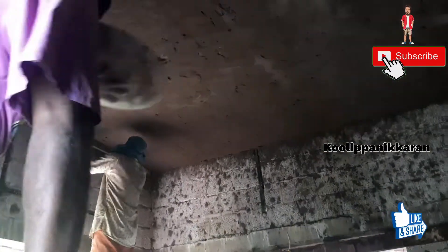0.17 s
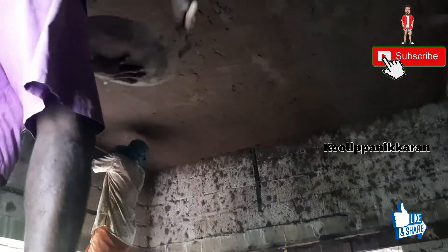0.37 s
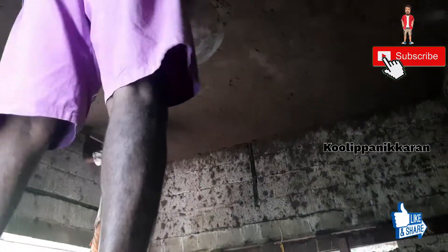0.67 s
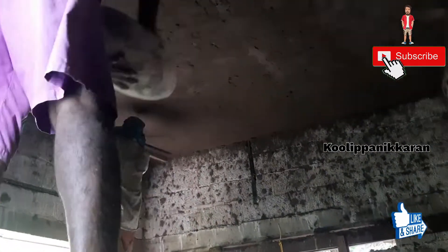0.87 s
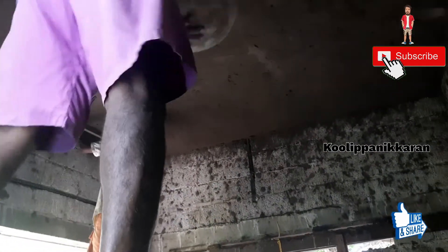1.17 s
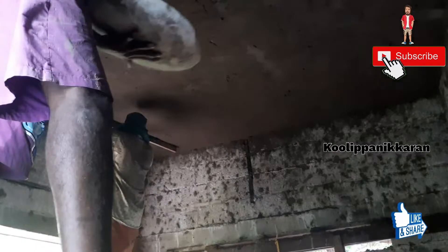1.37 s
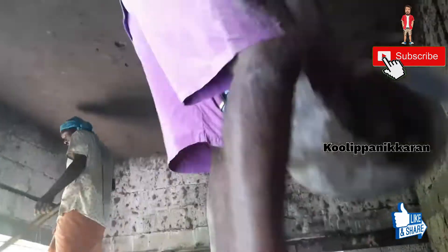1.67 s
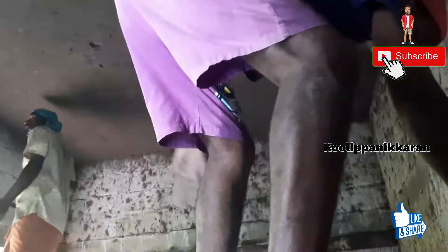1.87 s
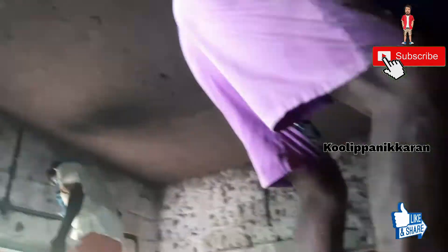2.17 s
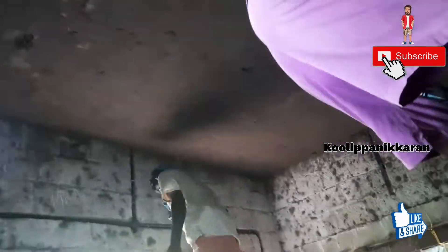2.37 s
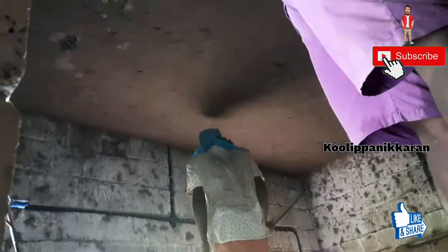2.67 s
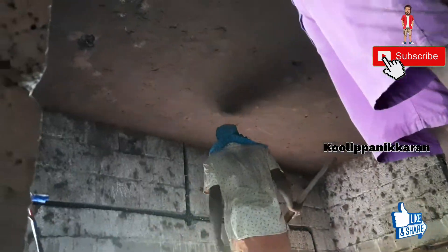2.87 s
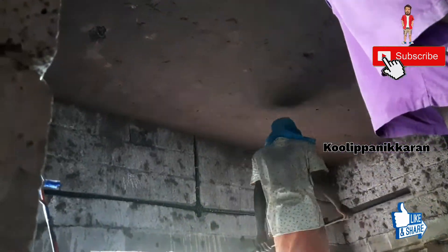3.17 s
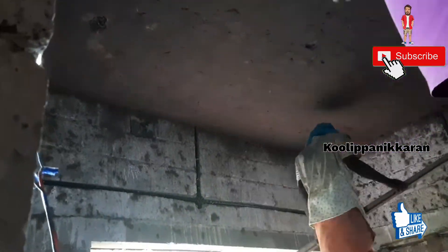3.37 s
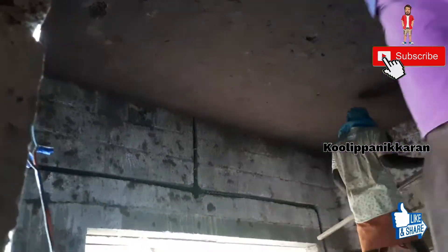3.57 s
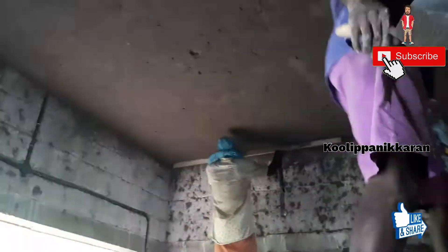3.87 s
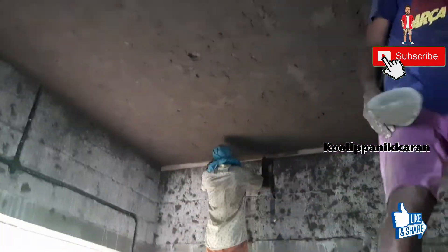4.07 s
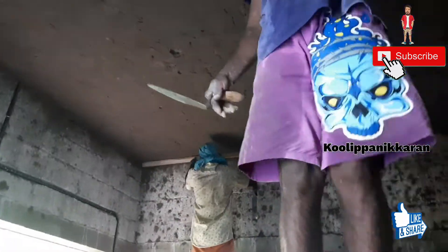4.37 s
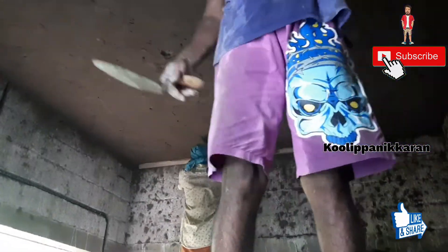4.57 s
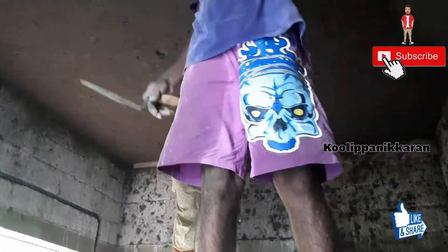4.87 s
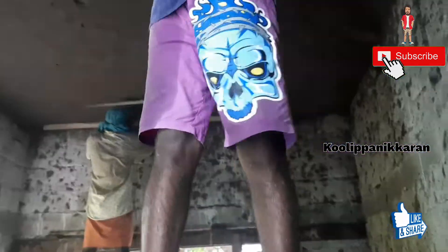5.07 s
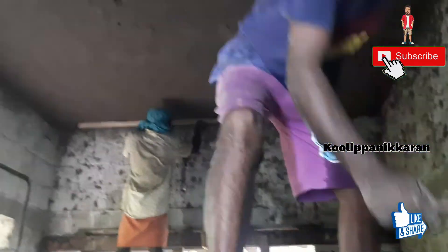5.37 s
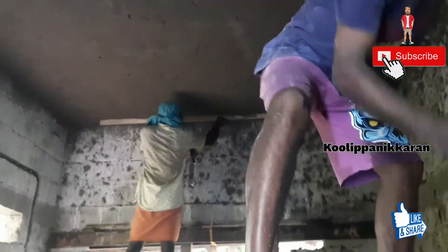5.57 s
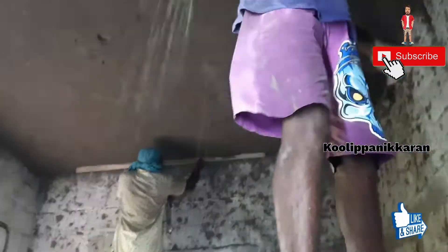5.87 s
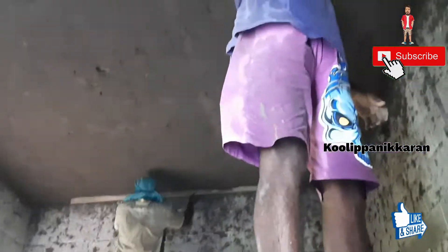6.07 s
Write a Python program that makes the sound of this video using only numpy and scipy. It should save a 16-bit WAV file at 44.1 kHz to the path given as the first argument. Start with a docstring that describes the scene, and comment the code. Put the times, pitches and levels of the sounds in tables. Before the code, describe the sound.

Plasterers work close by in a bare concrete room. Firm gritty scrapes and bright, quickly damped steel taps open, then heavy hollow thuds of planks hit around 1.7 and 3.3 seconds. Short light scratches and ticks fill the middle, softer longer strokes follow, a sharp tap rings at 5.5, and a plank groans near the end. Close microphone, short hard echo.

```python
"""Plasterers with steel trowels and sandy mortar in a bare concrete room, 6.23 s, two channels.
Firm short strokes and taps open over a drag: shaped noise for grit and blade tone, damped modes for taps.
Heavy thuds at 1.7-1.9 s and 3.3 s, random contacts rattling plank modes; some dead blows, single pulses.
Short strokes fill the middle; longer, softer ones follow. A sharp tap at 5.5 s, then a wavering plank groan.
Plank grumble and sway, shaped noise, run throughout; the hits echo in decaying noise."""
import sys
import numpy as np
from scipy import signal
from scipy.fft import rfft, irfft, next_fast_len
from scipy.io import wavfile
from scipy.ndimage import uniform_filter1d, map_coordinates

SR = 44100
rng = np.random.default_rng(int(sys.argv[2]) if len(sys.argv) > 2 else 0)


def waveform_to_disk(signal):
    """Save audio, clipped to [-1, 1], as 16-bit WAV at the path in sys.argv[1]."""
    frames = np.transpose(np.atleast_2d(signal))
    scaled = np.clip(frames, -1, 1) * 32767
    samples = np.round(scaled).astype(np.int16)
    wavfile.write(sys.argv[1], SR, samples)


N = 274743  # samples

# Room decay: freq_hz, t60_s
ROOM_DECAY = [(100, 0.4), (1000, 0.22), (10000, 0.39)]
# Planks under shifting weight: time_s, grumble_db, sway_db
WEIGHT_SHIFTS = [(0, -47, -63), (.35, -37.5, -73), (.69, -52, -78), (1.04, -43, -62), (1.28, -53, -64),
                 (1.52, -37, -42), (1.72, -32.5, -43), (1.87, -46, -47), (1.99, -37.5, -52),
                 (2.2, -51.5, -64), (2.45, -51, -53), (2.65, -55, -60), (2.95, -45.5, -64),
                 (3.25, -57.5, -62), (3.42, -45, -49), (3.54, -52.5, -51), (3.9, -53.5, -56),
                 (4.2, -51.5, -60), (4.46, -47, -54), (4.7, -56, -63), (5.08, -47, -50), (5.6, -39.5, -54),
                 (5.92, -32.5, -40), (6.23, -45, -51)]
# Plank modes: freq_hz, width_hz, level_db
PLANK_MODES = [(49, 28, -11.5), (119.5, 72, -6), (183.5, 79, -2.5), (261, 90, -1.5), (369, 120, -2),
               (509, 130, -3.5), (671, 185, -5), (1020, 820, -14)]
# Frame sway spectrum: freq_hz, relative_level_db (per Hz)
SWAY_SPECTRUM = [(12, -43), (30, -7), (60, -8), (120, -6.5), (200, -42)]
# Groan of a bending plank: time_s, pitch_hz, level_db
GROAN_PATH = [(5.84, 360.4, -54), (5.87, 337, -42), (5.92, 250.6, -25.5), (5.955, 280, -34),
              (6, 159.6, -39), (6.07, 171, -33), (6.11, 149.6, -42), (6.18, 172, -36), (6.23, 149, -42)]
# Rattling thuds on the planks: start_s, peak_db, pitch_hz, clatter_over_knock_db
THUD_HITS = [(.015, -19.5, 770, -6), (.162, -18, 556, -3.5), (.385, -19, 430, -31), (.702, -31.5, 415, -15),
             (1.029, -25, 614, -12), (1.123, -32, 102, -19), (1.488, -26.5, 137, -17),
             (1.592, -16, 484, -20), (1.629, -24, 188, -15), (1.708, -8.5, 428, -14),
             (1.795, -8.5, 670, -12), (1.919, -13.5, 292, -9), (2.085, -29, 310, -25),
             (2.275, -24, 305, -11), (2.512, -33, 175, -13), (2.774, -29.5, 268, 0), (2.812, -27.5, 437, 2),
             (3.016, -32.5, 388, -19), (3.094, -22.5, 406, -28), (3.234, -36.5, 339, -14),
             (3.304, -9.5, 262, 2), (3.312, -17, 900, -3), (3.346, -18.5, 368, -21), (3.662, -37, 347, -13),
             (3.758, -33.5, 296, -7), (3.951, -29.5, 471, -1.5), (3.972, -20.5, 315, -39),
             (3.98, -23.5, 90, -37), (4.486, -28.5, 503, -9), (4.934, -30.5, 590, -1), (4.97, -29, 400, -6),
             (5.059, -29.5, 267, -19), (5.203, -23.5, 210, -4), (5.237, -25, 487, 0),
             (5.267, -27, 993, 1.5), (5.879, -20, 308, -16), (5.97, -19.5, 480, -11),
             (6.038, -24.5, 161, -15), (6.079, -19.5, 272, -14)]
# Single dead blows: start_s, push_db, pitch_hz, snap_over_push_db
DEAD_BLOWS = [(1.904, -14, 250, -17), (3.298, -7, 354, -10), (3.373, -13, 377, -25), (3.976, -20, 305, -20),
              (5.719, -21, 385, -23)]
# Blade taps: start_s, peak_db, struck_pitch_hz
BLADE_TAPS = [(.0204, -17, 1570), (.0675, -12, 1230), (0.1626, -14.5, 1250), (0.916, -10.5, 1780),
              (.9787, -14, 1240), (1.5998, -18, 1130), (1.628, -21, 2200), (2.308, -12, 1680),
              (2.577, -29.5, 1930), (2.6015, -25, 2730), (2.7157, -28, 3660), (2.7284, -26, 2150),
              (2.816, -29, 1340), (2.8826, -24, 3200), (2.8945, -20, 2270), (2.9367, -28, 2090),
              (3.0142, -35, 2130), (3.0812, -21, 2100), (3.3998, -36, 1720), (3.4123, -25.5, 2110),
              (3.845, -31, 1410), (3.903, -34.5, 1500), (4.1393, -26, 1910), (5.239, -18.5, 1140),
              (5.2685, -24, 1500), (5.5211, -7, 1830), (5.7433, -24.5, 1800), (5.8703, -22, 1230)]
# Damped blade modes: freq_hz, mean_level_db, t60_s
BLADE_MODES = [(1237, -11.5, 0.027), (1430, -18, 0.067), (1798, -2, 0.042), (2030, 5, 0.018),
               (2750, 1, 0.018), (3410, 15, 0.0089), (3600, -23, 0.059), (6030, -29, 0.013)]
# Spreading between strokes: time_s, hiss_db
DRAG_LEVEL = [(0, -35.5), (.17, -44.5), (.25, -50.5), (.41, -43.5), (.69, -51.5), (.92, -37), (1.17, -49.5),
              (1.61, -41), (1.88, -59), (2.19, -59), (2.65, -59.5), (2.78, -51.5), (3.2, -59.5), (3.9, -57),
              (4.04, -45.5), (4.19, -58), (4.75, -64), (4.91, -54.5), (5.52, -40.5), (5.63, -51),
              (5.99, -56), (6.23, -48)]
# Trowel strokes: start_s, length_s, start_hiss_db, swell_to_end_db, tone_over_hiss_db
TROWEL_STROKES = [(.017, 0.034, -28, -2.5, 1.5), (.063, 0.018, -25, -4.5, -1),
                  (.165, 0.012, -32.5, -7, 10.5), (.462, .044, -31, 8.5, 1), (0.568, .07, -51, 0.5, 7),
                  (0.913, .038, -29.5, 4.5, 2.5), (.971, 0.016, -37, 6, 6.5), (1.298, 0.085, -48, 1.5, -1),
                  (1.418, 0.13, -35, -10, -0.5), (1.596, .0094, -36, 7.5, 1),
                  (1.713, 0.049, -29.5, -10.5, 1), (1.796, 0.016, -36.5, -7.5, 12),
                  (1.905, 0.015, -44.5, 9, 8.5), (1.943, .11, -47.5, -7.5, 6.5), (2.122, .012, -47, 1, -7),
                  (2.23, 0.021, -39, -2.5, 3.5), (2.255, 0.042, -33.5, 7.5, .6),
                  (2.304, 0.009, -24.5, -2.5, 3.5), (2.369, 0.088, -52.5, 5, 4), (2.491, .03, -53, -2, 5),
                  (2.589, .016, -46, 10.5, -6.5), (2.732, 0.013, -35.5, -4, 1.2),
                  (2.774, 0.029, -41, -8.5, 3), (2.818, .013, -31.5, -14, -2.5), (2.885, .016, -40, 6.5, 2),
                  (2.923, .013, -44, 8, 0), (2.983, 0.02, -48.5, -5, 5), (3.018, 0.016, -38.5, -5, 4),
                  (3.082, 0.014, -44.5, 3.5, 4.5), (3.132, .03, -54.5, 9.5, -6), (3.239, .014, -52, -12, 6),
                  (3.35, 0.016, -43.5, -7, 3), (3.401, .073, -50, 2.2, 3), (3.59, 0.047, -57.5, 0, 4.5),
                  (3.666, .038, -56.5, 2.2, 7.5), (3.782, 0.02, -45, -5, -0.5), (4.052, 0.09, -45, 6, -2),
                  (4.226, 0.065, -40, 2.5, -5.5), (4.338, .046, -45, 3.5, -3.5),
                  (4.414, .018, -43.5, .6, -1.5), (4.48, .024, -53, 9, 3.5), (4.561, 0.038, -41.5, -1, -2),
                  (4.645, 0.047, -43.5, 4, -3.5), (4.878, .12, -45, 7, 0), (5.099, 0.018, -45.5, 1.5, -13),
                  (5.163, 0.079, -40, 2.5, -2.5), (5.265, .017, -43.5, -12, 15.5),
                  (5.519, .013, -36.5, 1.5, 4.5), (5.673, .06, -40, 1, -8), (5.798, 0.18, -40, -1.5, -2.5),
                  (6.035, 0.063, -44, -0.5, -1), (6.124, .13, -42.5, 2.5, -6.5)]
# Blade angle: time_s, tilt (0 flat, 1 on edge)
BLADE_TILT = [(0, .5), (1, 0.45), (1.9, 0.25), (2.7, 0.66), (3.1, .65), (4, 0.12), (5.3, 0.06), (5.7, 0.5),
              (6.23, .45)]
# Sand hiss spectrum: freq_hz, relative_level_db (per Hz)
SAND_SPECTRUM = [(1200, -25.5), (2400, -11), (3200, -12), (5400, -9.5), (6700, -8.5), (7800, -11.5),
                 (9200, -22.5), (11500, -15.5), (15800, -13.5)]
# Flat blade spectrum: freq_hz, relative_level_db (per Hz)
FLAT_SPECTRUM = [(350, -17), (700, -7), (1000, -4.5), (1500, -3.5), (1900, -11), (2500, -27), (4000, -61)]
# Blade on edge spectrum: freq_hz, relative_level_db (per Hz)
EDGE_SPECTRUM = [(900, -34), (1500, -2.5), (1900, 1), (2300, -3.5), (3100, -6), (3900, -10), (5500, -27)]
# Position of the work: time_s, left_over_right_db
WORK_PAN = [(0, -1), (1.6, -0.5), (2.3, -3), (2.8, -1), (3.3, -3), (4, -1), (5.2, -0.5), (5.5, 0.5),
            (6.2, -1.5)]
# Channel likeness of the noise: freq_hz, correlation
LIKENESS = [(60, 0.93), (300, 0.94), (640, 0.56), (1400, 0), (15000, 0.039)]
# Channel colour: freq_hz, left_over_right_db
CHANNEL_LEAN = [(60, 1), (500, -0.5), (1300, -1), (6000, -1.5), (8000, 2), (10000, 7), (15800, 5)]

TOP_HZ = 15800
ECHO_DB = -12.5
RATTLE_T60_S, RATTLE_T60_S_PER_DB, RATTLE_HZ = 0.13, 0.0012, 400  # t60 at 0 dB and this pitch
CRACK_OVER_RING_DB = -1
FIRM_DB, FIRM_BITE_S = -29.5, 0.003  # firm stroke: hiss level, time of its last 10 dB of rise
SOFT_BITE_SHARE_PER_DB = 0.03  # extra bite, share of stroke length per dB below firm
LIFT_DB_PER_S, LINGER_PER_S = 747, 4  # lift-off rate, divided by 1 + linger * length
DRAG_TONE_OVER_HISS_DB = -1.3
CHIPS_PER_S, CHIPS_OVER_HISS_DB = 90, -12


def amp(db):
    """Decibels to gain."""
    return 10 ** (np.asarray(db) / 20)


def unit(x):
    """Scale to rms 1."""
    return x / np.sqrt(np.mean(x ** 2) + 1e-20)


def along(points, hz):
    """Interpolate (Hz, value) points on a log-frequency axis."""
    point_hz, values = np.transpose(points)
    return np.interp(np.log(hz + 1), np.log(point_hz + 1), values)


def curves(rows):
    """One value per sample for each column after the time."""
    time_s, *columns = np.transpose(rows)
    return [np.interp(np.arange(N) / SR, time_s, column) for column in columns]


def wobble(knots_per_s):
    """Smooth random curve through normal knots."""
    knots = rng.standard_normal(int(N * knots_per_s / SR) + 4)
    return map_coordinates(knots, [np.arange(N) * knots_per_s / SR])


def filtered(x, response):
    """Apply a complex frequency response."""
    size = next_fast_len(x.shape[-1] + 8192)
    spectrum = rfft(x, size) * response(np.fft.rfftfreq(size, 1 / SR))
    return irfft(spectrum, size)[..., :x.shape[-1]]


def resonance(f, hz, width_hz):
    """Causal second-order resonance, gain 1 at its top."""
    return 1j * f * width_hz / (hz * hz - f * f + 1j * f * width_hz)


def sides(left_over_right_db):
    """Left and right gains, half the difference each."""
    return amp(np.multiply.outer([0.5, -0.5], left_over_right_db))


def gritty(colour, grit_db, patchy_db):
    """Stereo noise of unequal grains, its spectrum shifting in patches, its bass alike in both channels."""
    grain_db = grit_db * np.minimum(rng.exponential(size=N // 8 + 1), 4)
    sizes = amp(grain_db).repeat(8)[:N]  # 8-sample grains
    z = signal.stft(sizes * rng.standard_normal((2, N)), nperseg=256)[2]
    field = rng.standard_normal(z.shape[1:])
    field = uniform_filter1d(field, size=4, axis=0)
    field = uniform_filter1d(field, size=5, axis=1)
    pair = signal.istft(z * amp(patchy_db * unit(field)), nperseg=256)[1][:, :N]

    def mid_side(hz):
        angle = np.arccos(np.clip(along(LIKENESS, hz), -1, 1)) / 2
        return colour(hz) * [np.cos(angle), np.sin(angle)]

    mid, side = filtered(pair, mid_side)
    return unit(np.array([mid + side, mid - side]))


def room(x):
    """Concrete reverberation: delayed noise tail, each frequency decaying at its own rate."""
    hz, t, z = signal.stft(rng.standard_normal((2, SR // 2)), SR, nperseg=256)
    decay = amp(-60 * t / along(ROOM_DECAY, hz)[:, None])
    tail = signal.istft(z * decay, SR, nperseg=256)[1]
    delayed = np.pad(x, ((0, 0), (300, 0)))
    return signal.fftconvolve(delayed, tail / np.linalg.norm(tail[0]), axes=1)[:, :N]


def plank(f):
    """Sum of broad plank modes, alternating in sign."""
    return sum((-1) ** k * amp(db) * resonance(f, hz, width_hz)
               for k, (hz, width_hz, db) in enumerate(PLANK_MODES))


def grumble():
    """Loose planks rub, noise through their modes; the frame sways below them."""
    grumble_db, sway_db = curves(WEIGHT_SHIFTS)
    rub = amp(1.2 * wobble(30) + 2.1 * wobble(12))
    rub = rub * gritty(plank, grit_db=2.0, patchy_db=2.5)
    sway = amp(2.0 * wobble(9))
    sway = sway * gritty(lambda hz: amp(along(SWAY_SPECTRUM, hz)), grit_db=-0.5, patchy_db=2)
    return amp(grumble_db) * unit(rub) + amp(sway_db) * unit(sway)


def groan():
    """Slip in a bending plank: narrow wavering band along the pitch path."""
    hz, db = curves(GROAN_PATH)
    heard = np.arange(N) > GROAN_PATH[0][0] * SR
    phase = 2 * np.pi * np.cumsum(hz) / SR
    in_phase = np.cos(phase) * (1 + 0.35 * wobble(35))
    quadrature = np.sin(phase) * 0.4 * wobble(35)
    return heard * amp(db) * (in_phase + quadrature)


def thuds():
    """Feet, tools and mortar lumps: dying rattles of contacts excite plank modes up to the contact pitch."""
    out, t = np.zeros((2, N + SR)), np.arange(SR // 3) / SR
    for start_s, peak_db, hz, clatter_db in THUD_HITS:
        t60_s = RATTLE_T60_S + RATTLE_T60_S_PER_DB * peak_db
        t60_s *= min(RATTLE_HZ / hz, 1.5) ** 0.47  # higher dies sooner
        contacts = rng.standard_normal((2, len(t))) * (rng.random(len(t)) < 2200 / SR)
        rattle = contacts[0] + 0.38 * contacts[1] * [[1], [-1]]  # spread along the plank
        rattle[:, 40] = -4  # one sure contact
        blows = rattle * amp(-60 * t / np.clip(t60_s, 0.01, 0.6)) * (1 - np.exp(-t / 0.0017))
        knock = filtered(blows, lambda f: plank(f) * (
            resonance(f, hz, 1.07 * hz) + 0.33 / (1 + 1j * f / hz) ** 2))
        clatter = filtered(blows * amp(-60 * t / 0.3), lambda f: (
            resonance(f, 990, 1250) ** 2 / (1 + 1j * f / 2500) ** 2))
        both = knock / np.abs(knock).max() + amp(clatter_db) * clatter / np.abs(clatter).max()
        out[:, round(start_s * SR):][:, :len(t)] += amp(peak_db) * both / np.abs(both).max()
    return out[:, :N]


def dead_blows():
    """One push and pull of air under a steel snap, with a longer deep jolt of the frame."""
    out, t = np.zeros(N + SR), np.arange(SR // 4) / SR
    for start_s, push_db, hz, snap_db in DEAD_BLOWS:
        push = np.sin(2 * np.pi * hz * t) * np.clip(4 * (1.1 - hz * t), 0, 1)  # about one cycle
        noise = filtered(rng.standard_normal(len(t)), lambda f: 1 / (1 + 1j * f / 4500) ** 2)
        snap = amp(snap_db - 60 * t / 0.0084) * (np.sin(2 * np.pi * 4100 * t) + 0.9 * noise)
        jolt = 0.072 * amp(-60 * t / 0.32) * np.sin(2 * np.pi * 42 * t)
        out[round(start_s * SR):][:len(t)] += amp(push_db) * (push + snap + jolt)
    return out[:N]


def taps():
    """A crack and the mortar-damped blade's modes, strongest near the struck pitch."""
    out, t = np.zeros((2, N + SR)), np.arange(SR // 8) / SR
    lag_s = np.array([[0], [0.00012]])  # right ring lags in phase
    for start_s, peak_db, pitch_hz in BLADE_TAPS:
        ring = 0
        for hz, mode_db, t60_s in BLADE_MODES:
            level_db = mode_db + rng.normal(0, 3.2) - 29.4 * abs(np.log2(hz / pitch_hz))
            ring = ring + amp(level_db - 60 * t / t60_s) * np.sin(2 * np.pi * hz * (t - lag_s))
        ring = ring * (1 - np.exp(-t / 0.00018))
        crack = filtered(rng.standard_normal((2, len(t))), lambda f: (
            resonance(f, 2700, 4800) / (1 + 1j * f / 6000) ** 2))
        crack = amp(-60 * t / 0.0072) * crack
        tap = ring / np.abs(ring).max() + amp(CRACK_OVER_RING_DB) * crack / np.abs(crack).max()
        out[:, round(start_s * SR):][:, :len(t)] += amp(peak_db) * tap / np.abs(tap).max()
    return out[:, :N]


def stroke_powers():
    """Hiss and tone power per sample: drag plus strokes that bite, swell and lift off."""
    t = np.arange(N) / SR
    hiss = amp(2 * curves(DRAG_LEVEL)[0])  # doubled dB: power
    tone = hiss * amp(2 * DRAG_TONE_OVER_HISS_DB)
    for start_s, length_s, first_db, swell_db, tone_db in TROWEL_STROKES:
        span = slice(max(int((start_s - 0.1) * SR), 0), int((start_s + length_s + 0.15) * SR))
        u = t[span] - start_s
        bite_s = FIRM_BITE_S + SOFT_BITE_SHARE_PER_DB * max(FIRM_DB - first_db, 0) * length_s
        lift_db_per_s = LIFT_DB_PER_S / (1 + LINGER_PER_S * length_s)
        level_db = first_db + swell_db * np.clip(u / length_s, 0, 1)
        level_db += 10 * np.minimum(u, 0) / bite_s
        level_db -= lift_db_per_s * np.maximum(u - length_s, 0)
        hiss[span] += amp(2 * level_db)
        tone[span] += amp(2 * (level_db + tone_db))
    return hiss, tone


def trowels():
    """Sand ground under the blade hisses, chips and sounds its broad tone, higher on edge."""
    hiss, tone = stroke_powers()
    tilt = np.clip(curves(BLADE_TILT)[0], 0, 1)
    catch = wobble(70)  # edge catches and slips, shared by all three
    sand = amp(0.84 * catch + wobble(200))
    sand = sand * gritty(lambda hz: amp(along(SAND_SPECTRUM, hz)), grit_db=2.0, patchy_db=0.6)
    flat = amp(0.88 * catch + 1.03 * wobble(90))
    flat = flat * gritty(lambda hz: amp(along(FLAT_SPECTRUM, hz)), grit_db=2, patchy_db=3.0)
    edge = amp(0.99 * catch + 0.78 * wobble(120))
    edge = edge * gritty(lambda hz: amp(along(EDGE_SPECTRUM, hz)), grit_db=4, patchy_db=6.0)
    # coarse grains snapping
    chips = rng.standard_normal((2, N)) * (rng.random(N) < CHIPS_PER_S / SR)
    chips = filtered(chips, lambda f: resonance(f, 2500, 1500) - 0.66 * resonance(f, 6400, 4500))
    grinding = np.sqrt(hiss) * (unit(sand) + amp(CHIPS_OVER_HISS_DB) * unit(chips))
    flat_tone = np.sqrt(tone * (1 - tilt)) * unit(flat)
    edge_tone = np.sqrt(tone * tilt) * unit(edge)
    return grinding + flat_tone + edge_tone


def scene():
    """Panned hits and trowels over the echo of the hits and the plank grumble."""
    hits = thuds() + dead_blows() + taps() + groan()
    work = (hits + trowels()) * sides(curves(WORK_PAN)[0])
    return work + amp(ECHO_DB) * room(hits) + grumble()


def record(dry):
    """Colour the two channels differently and cut everything from TOP_HZ up."""
    return filtered(dry, lambda hz: sides(along(CHANNEL_LEAN, hz)) * (hz < TOP_HZ))


dry = scene()
out = record(dry)
waveform_to_disk(out)
```